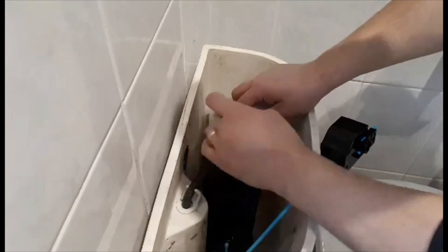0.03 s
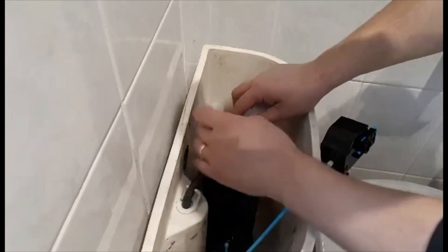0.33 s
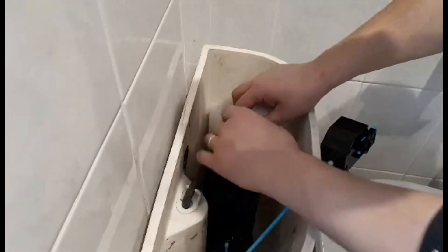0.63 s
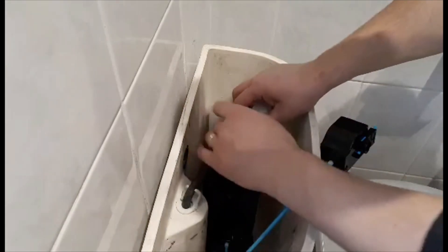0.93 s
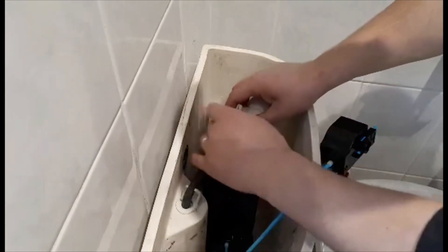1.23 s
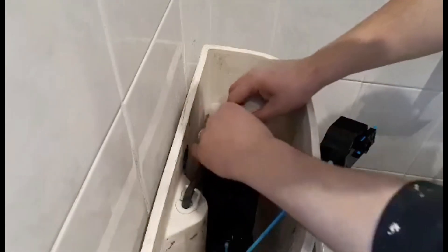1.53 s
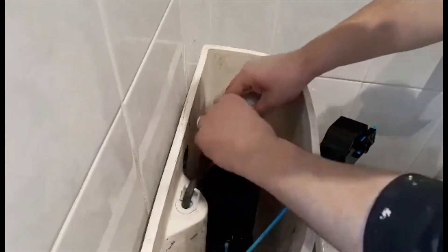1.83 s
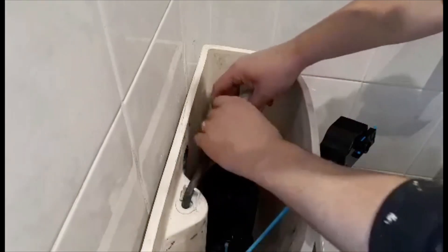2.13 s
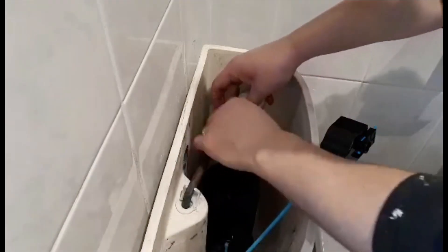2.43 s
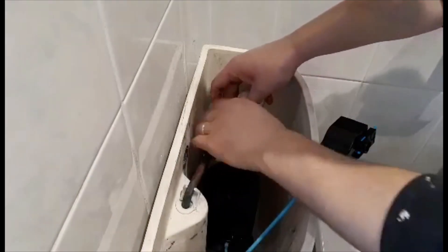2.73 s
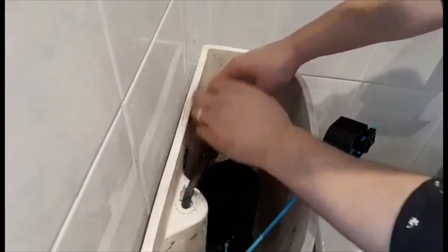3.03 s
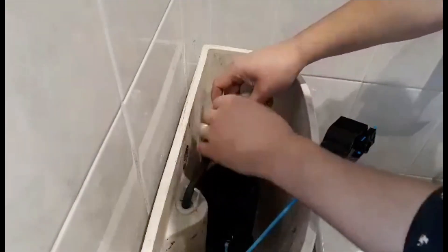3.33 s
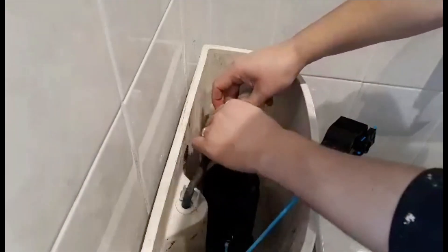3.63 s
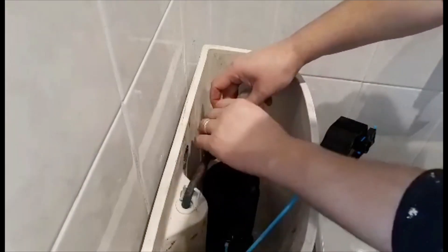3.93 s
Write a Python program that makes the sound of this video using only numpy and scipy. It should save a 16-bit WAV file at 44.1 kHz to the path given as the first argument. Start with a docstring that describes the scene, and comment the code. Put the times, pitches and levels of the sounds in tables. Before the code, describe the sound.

Hands turn a plastic fitting in a toilet tank: a sharp snap, knocks and short scrapes.

```python
"""A quick clatter and a sharp snap, then knocks and short scrapes, in a small tiled bathroom.
Hands snap a plastic fitting loose inside an open ceramic toilet cistern and turn it in strokes.
Impacts and stick-slip friction excite the normal modes of both bodies: the tank rings near 1 kHz,
the plastic above 3 kHz. Underneath, a low rumble keeps the room's resonances sounding."""
import sys
import numpy as np
from scipy import signal
from scipy.fft import rfft, irfft
from scipy.io import wavfile
from scipy.ndimage import uniform_filter1d

SR = 44100
rng = np.random.default_rng(int(sys.argv[2]) if len(sys.argv) > 2 else 0)


def materialize(psi):
    """Save the field psi as 16-bit PCM at rate SR to the path in sys.argv[1].

    A 1-D psi becomes a single channel; in a 2-D psi each row is a channel.
    """
    bounded = np.clip(np.atleast_2d(psi).T, -1, 1)
    quanta = np.round(bounded * 32767).astype(np.int16)
    wavfile.write(sys.argv[1], SR, quanta)


N = 4 * SR
TIME, TAIL = np.arange(N) / SR, np.arange(SR) / SR   # seconds: the scene, an impulse response

# normal modes of the ceramic tank and the plastic fitting: pitch_hz, relative_db, t60_s
TANK_MODES = [(409, -8, .7), (619, -13, .6), (868, -9, .7), (931, -1, 1.0), (965, -2, .9), (1034, 1, 1.0),
              (1178, -5, .8), (1201, -7, .7), (1328, -11, .6), (1450, -9, .6), (1515, -8, .6)]
FITTING_MODES = [(3158, -5, .25), (3394, 0, .3), (3529, -2, .3), (3629, -3, .3), (4190, 0, .33),
                 (4524, -2, .3), (4720, -2, .35), (4890, -2, .33), (5352, -1, .37), (5793, -5, .3),
                 (6412, -6, .2), (7315, -9, .3)]
# left-right coherence of the sound field: frequency_hz, correlation
COHERENCE = [(40, 0.6), (140, 0.97), (300, .92), (550, 0.64), (1000, 0.11), (3000, 0.14), (6000, 0.12),
             (9000, .05)]


def from_db(db):
    """Amplitude grows tenfold every 20 dB."""
    return 10 ** (np.asarray(db) / 20)


def unit_rms(x):
    """Normalise a signal to unit mean power."""
    return x / np.sqrt(np.mean(x ** 2) + 1e-20)


def unit_energy(response):
    """Normalise a response to unit energy, averaged over channels."""
    return unit_rms(response) / np.sqrt(response.shape[-1])


def at_hz(points, hz):
    """Interpolate a table on a log-frequency axis."""
    frequency, value = np.transpose(points)
    return np.interp(np.log(np.maximum(hz, 1)), np.log(frequency), value)


def convolve(x, response):
    """A linear system's output is its input convolved with its impulse response."""
    return signal.fftconvolve(np.atleast_2d(x), np.atleast_2d(response), axes=-1)[:, :x.shape[-1]]


def colour(x, spectrum, size=8192):
    """A minimum-phase filter of unit energy imposes a spectrum causally."""
    gain = from_db(at_hz(spectrum, np.fft.rfftfreq(size, 1 / SR)))
    cepstrum = irfft(np.log(gain))
    cepstrum[size // 2:] = 0
    response = irfft(np.exp(2 * rfft(cepstrum)))[:size // 2]
    return convolve(x, unit_energy(response))


def drift(per_s):
    """Random modulation: straight lines between Gaussian values."""
    knots = rng.standard_normal(2000)
    return np.interp(TIME * per_s, np.arange(len(knots)), knots)


def stereo_noise(size):
    """Diffuse-field noise: coherent in the bass, nearly independent in the treble."""
    mid, side = rfft(rng.standard_normal((2, size)))
    alike = at_hz(COHERENCE, np.fft.rfftfreq(size, 1 / SR))
    return unit_rms(irfft(np.sqrt(1 + alike) * mid + np.sqrt(1 - alike) * side * [[1], [-1]], size))


def reverberation(wet_db, scatter_t60_s=0.055, build_s=0.012):
    """Early reflections scatter between the tank walls; the tiled room then decays band by band."""
    # reverberation time of the room: frequency_hz, t60_s
    room_t60 = [(150, 1), (400, 0.94), (1000, 0.84), (2000, 0.61), (4000, 0.47), (8000, .4), (13000, 0.43)]
    early = stereo_noise(SR) * from_db(-60 * TAIL / scatter_t60_s)
    for _ in range(6):   # flatten the spectrum while keeping the burst short
        early = irfft(np.exp(1j * np.angle(rfft(early)))) * (TAIL < scatter_t60_s / 2)
    noise, late = rfft(stereo_noise(SR)), 0
    hz = np.fft.rfftfreq(SR, 1 / SR)
    edges_hz = np.geomspace(20, 20000, 16)
    for low, high in zip(edges_hz, edges_hz[1:]):
        decay = from_db(-60 * TAIL / at_hz(room_t60, np.sqrt(low * high)))
        late = late + irfft(noise * ((hz >= low) & (hz < high))) * decay
    late = unit_energy(late * (1 - np.exp(-TAIL / build_s)))
    return unit_energy(unit_energy(early) + from_db(wet_db) * late)


def ringing(modes, rise_s=0.0014):
    """Normal modes ring as damped sines, further out of phase left to right where coherence is low."""
    ring = 0
    for hz, db, t60 in modes:
        apart = np.arccos(at_hz(COHERENCE, hz)) * rng.choice([-1, 1]) * np.array([[.5], [-.5]])
        phase = 2 * np.pi * (hz * TAIL + rng.random()) + apart
        ring = ring + from_db(db - 60 * TAIL / t60) * np.sin(phase)
    return unit_energy(ring * (1 - np.exp(-TAIL / rise_s)))


def impulses(times_s, levels_db, span_s=0.0061):
    """A brief impact acts as an impulse, holding the energy of its level kept up for span_s."""
    force = np.zeros(N)
    force[(times_s * SR).astype(int)] = from_db(levels_db) * np.sqrt(span_s * SR)
    return force


def still_air():
    """Still air sets the noise floor, faint and stationary."""
    # noise spectrum: frequency_hz, density_db
    air_spectrum = [(20, -12.5), (50, 1), (300, 2), (1000, -5), (2500, -8.5), (6000, -8), (9000, -15),
                    (13000, -12), (15000, -26.5)]
    return from_db(-74) * colour(stereo_noise(N), air_spectrum)


def rumble():
    """Low noise swells with the handling, and the room's standing waves boom under random forcing."""
    # envelopes of the rumble and of the boom: time_s, relative_db
    rumble_envelope = [(0, -36.5), (0.301, -39), (0.58, -49.5), (0.76, -45), (1.05, -44), (1.4, -40.5),
                       (1.499, -51), (1.601, -44), (1.748, -50), (2.0, -48), (2.2, -44.5), (2.562, -40.5),
                       (2.669, -47.5), (2.899, -42.5), (3.151, -46.5), (3.423, -53), (3.721, -54),
                       (4, -51.5)]
    boom_envelope = [(0, -51), (0.549, -53.5), (0.78, -49.5), (1.199, -50.5), (1.55, -52.5), (2.02, -55.5),
                     (2.22, -48.5), (2.552, -44.5), (2.75, -52.5), (3.0, -48.5), (3.349, -54), (3.52, -52),
                     (4, -50)]
    # broad spectrum of the rumble: frequency_hz, density_db
    rumble_spectrum = [(20, -41.5), (60, -26.5), (80, -13.5), (110, -5), (170, -10.5), (197, -10), (240, 1),
                       (305, 2), (345, 8), (415, 8), (470, -15.5), (620, -6), (750, -21), (1000, -14.5),
                       (1600, -35.5), (3000, -52), (8000, -87.5)]
    # standing waves: pitch_hz, relative_db, t60_s
    room_modes = [(147, 0, 1.2), (175, -6, 1.0), (265, -11, .8), (334, -6, .7), (357, -1, .7),
                  (406, -8, .7), (536, -14, .8), (622, -13, .8)]
    broad = unit_rms(colour(stereo_noise(N + SR), rumble_spectrum)[:, SR:])
    boom = convolve(rng.standard_normal(N + SR), ringing(room_modes))[:, SR:]
    boom_power = uniform_filter1d(np.mean(boom ** 2, axis=0), size=SR // 4)
    rumble_db = np.interp(TIME, *np.transpose(rumble_envelope)) - 3
    boom_db = np.interp(TIME, *np.transpose(boom_envelope)) + 3.5 * drift(per_s=9.7)
    return from_db(rumble_db) * broad + from_db(boom_db) * boom / np.sqrt(boom_power)


def hand_bumps():
    """A soft contact carries little treble, so hands on the tank excite only low resonances."""
    # bumps: start_s, level_db
    contacts = [(0.129, -43), (0.735, -32), (0.849, -27.5), (0.904, -34), (1.118, -29.5), (1.803, -39),
                (1.919, -35.5), (2.085, -35.5), (2.24, -36), (2.356, -31), (2.508, -33.5), (2.775, -29),
                (2.97, -36.5), (3.008, -47), (3.671, -36), (3.714, -51.5), (3.838, -39.5)]
    # spectrum of a soft contact: frequency_hz, density_db
    bump_spectrum = [(30, -32.5), (100, -20), (150, -8), (200, -13), (300, -15.5), (360, 15), (430, -5),
                     (520, -4), (700, -15), (1500, -37), (4000, -70)]
    force = impulses(*np.transpose(contacts))
    return convolve(force, colour(reverberation(wet_db=-2.5), bump_spectrum))


def nail_ticks():
    """Sudden release: a fingernail catches and lets go with a thin, bright tick."""
    # releases: start_s, level_db
    releases = [(0.128, -26.5), (0.519, -67), (1.782, -51.5), (2.357, -56)]
    # spectrum of a tick: frequency_hz, density_db
    tick_spectrum = [(1000, -22), (4000, -11), (6300, -5.5), (7300, 3.5), (8600, -16.5), (12800, -8)]
    tick = colour(reverberation(wet_db=-5.5, scatter_t60_s=0.016), tick_spectrum)
    return convolve(impulses(*np.transpose(releases)), tick)


def grip(span_s, t60_s=0.022):
    """A fresh random set of short resonances gives each stroke's rasp a slightly different colour."""
    t = TAIL[TAIL < span_s]
    return unit_energy(rng.standard_normal(len(t)) * from_db(-60 * t / t60_s))


def scrapes(slips_per_s=1800, slip_spread_db=3.5, grip_span_s=0.02):
    """Stick-slip friction: each turn is a run of tiny slips that rasp the plastic and drive the tank."""
    # turns of the fitting: start_s, length_s, tank_db, hiss_db
    strokes = [(-0.04, 0.09, -28, -39), (0.069, 0.035, -35, -44), (0.491, 0.097, -53, -55),
               (0.575, 0.075, -44.5, -47), (0.614, 0.13, -43.5, -44), (0.84, 0.15, -41, -41),
               (0.938, 0.1, -45, -47), (1.122, 0.087, -39, -58), (1.359, 0.048, -63.5, -70.5),
               (1.449, 0.08, -84.5, -62.5), (1.691, 0.16, -52, -69), (1.767, 0.067, -51, -58.5),
               (2.028, 0.16, -47, -61.5), (2.11, 0.099, -48.5, -55), (2.206, 0.055, -49.5, -59.5),
               (2.333, 0.16, -53.5, -62.5), (2.446, 0.12, -48.5, -58.5), (2.733, 0.099, -47, -57),
               (2.815, 0.086, -38.5, -40), (2.869, 0.12, -42.5, -46.5), (3.139, 0.11, -48, -58.5),
               (3.218, 0.064, -61, -70), (3.478, 0.18, -81, -65.5), (3.573, 0.17, -57.5, -62.5),
               (3.718, 0.088, -62, -59.5)]
    # spectra of the tank's hollow rub and the plastic's hiss: frequency_hz, density_db
    rub_spectrum = [(60, -34.5), (200, -10.5), (400, -1), (620, 1), (780, -7), (980, 0.5), (1250, -3.5),
                    (1600, -6), (1900, -22), (2200, -13.5), (2600, -34), (5000, -48.5)]
    hiss_spectrum = [(500, -13.5), (1800, 1.5), (2400, -4.5), (3100, -1), (3700, -2.5), (4800, 3),
                     (5900, -1), (6900, 5.5), (7800, -9), (8800, -20.5), (10700, -20.5), (12800, -12.5)]
    sizes = from_db(slip_spread_db * np.minimum(rng.exponential(1, N), 4)) * rng.choice([-1, 1], N)
    pressure = from_db(0.5 * drift(per_s=70) + 2 * drift(per_s=220))   # flutter and chatter
    slipping = rng.random(N) < slips_per_s / SR
    slips = unit_rms(sizes * slipping * pressure)
    tank_force, plastic_force = np.zeros((2, N))
    for start_s, length_s, tank_db, hiss_db in strokes:
        now = (TIME >= start_s) & (TIME < start_s + length_s + grip_span_s)
        progress = np.clip((TIME[now] - start_s) / length_s, 0, 1)
        turn = slips[now] * np.abs(np.sin(np.pi * progress)) ** 1.7
        tank_force[now] += from_db(tank_db) * turn
        plastic_force[now] += from_db(hiss_db) * convolve(turn, grip(grip_span_s))[0]
    tank = colour(reverberation(wet_db=-6), rub_spectrum) + from_db(-7) * ringing(TANK_MODES)
    plastic = colour(reverberation(wet_db=-7), hiss_spectrum) + from_db(-18.5) * ringing(FITTING_MODES)
    return convolve(tank_force, tank) + convolve(plastic_force, plastic)


def knocks():
    """Impact excites both bodies into free vibration: the tank rings and the plastic cracks brightly."""
    # blows of the fitting on the tank: start_s, tank_db, snap_db
    blows = [(0.015, -24, -50), (0.032, -26, -50), (0.054, -28, -56), (0.083, -25, -45.5),
             (0.1252, -18.5, -21), (0.1278, -35, -14.5), (0.1372, -14, -27.5), (0.643, -39, -72),
             (0.8475, -29.5, -58), (0.853, -26.5, -56), (0.868, -34, -58), (1.118, -23.5, -43.5),
             (1.1233, -30, -55), (1.917, -53.5, -76), (2.092, -53, -76.5), (2.147, -51.5, -72),
             (2.232, -54.5, -68.5), (2.243, -43.5, -82), (2.357, -42.5, -66), (2.399, -57, -72.5),
             (2.502, -48.5, -75.5), (2.521, -52, -67), (3.186, -48.5, -70.5)]
    # impact spectra of ceramic and plastic: frequency_hz, density_db
    tank_spectrum = [(40, -41.5), (150, -27.5), (380, -7), (520, -10.5), (780, -9.5), (980, 4.5),
                     (1250, -9), (1550, -3.5), (1900, -19.5), (2450, -25.5), (2950, -17.5), (3350, -28),
                     (4800, -29.5), (12000, -78)]
    snap_spectrum = [(500, -41.5), (2000, -15), (2600, -10), (3100, -2.5), (3550, -1), (3800, -1),
                     (4150, -3), (4400, -2.5), (4800, 1.5), (5900, -9), (6450, -9.5), (7000, -11),
                     (7700, -10), (8700, -25.5), (10700, -34), (13000, -30)]
    # short-lived modes of the tank's air cavity and the fitting's wall: pitch_hz, relative_db, t60_s
    cavity_modes = [(978, 2.5, 0.054), (1210, -2, 0.0426), (1518, -8, 0.097)]
    wall_modes = [(2966, -0.5, 0.075), (3200, 1.5, 0.021), (3460, 0, .045), (4180, -3.5, .04),
                  (4950, 5, 0.075), (4710, -3.5, 0.01), (5363, -4, 0.072), (5640, -4, 0.074),
                  (6370, 1.5, .038), (7670, -7, .04)]
    snap = colour(reverberation(wet_db=2, scatter_t60_s=0.035), snap_spectrum)
    fitting_ring = from_db(-9) * ringing(FITTING_MODES)
    knock = colour(reverberation(wet_db=-4), tank_spectrum)
    tank_ring = from_db(-5.5) * ringing(TANK_MODES)
    hollow_note = from_db(-1.5) * ringing(cavity_modes)
    clack = from_db(-2.5) * ringing(wall_modes)
    crack = from_db(1) * colour(reverberation(wet_db=-20, scatter_t60_s=0.016), snap_spectrum)
    start_s, tank_db, snap_db = np.transpose(blows)
    tank = convolve(impulses(start_s, tank_db), knock + tank_ring + hollow_note)
    plastic = convolve(impulses(start_s, snap_db), snap + fitting_ring + clack + crack)
    return tank + plastic


def scene():
    """The sources superpose over still air; a level difference places the work to the left."""
    # channel balance: frequency_hz, left_minus_right_db
    balance = [(40, 1.5), (120, 0.5), (300, 3), (600, 3), (1100, 5), (2200, 6), (4500, 1), (7000, 4),
               (9500, 15), (13000, 10)]
    work = knocks() + nail_ticks() + hand_bumps() + scrapes() + rumble()
    difference_db = at_hz(balance, np.fft.rfftfreq(2 * N, 1 / SR))
    pan = from_db(difference_db * np.array([[.5], [-.5]]))
    return irfft(rfft(work, 2 * N) * pan)[:, :N] + still_air()


def record(dry, ceiling=0.85, cutoff_hz=13250):
    """Soft saturation rounds the hardest peaks, and a steep low-pass filter cuts the top."""
    rounded = ceiling * np.tanh(dry / ceiling)
    low_pass = signal.firwin(301, cutoff_hz, fs=SR, window="blackman")
    return signal.fftconvolve(rounded, low_pass[None], "same", axes=-1)


dry = scene()
out = record(dry)
materialize(out)
```